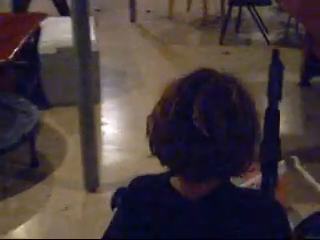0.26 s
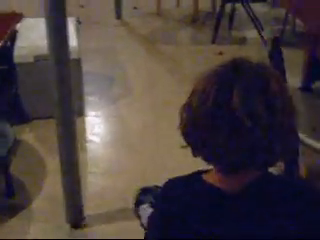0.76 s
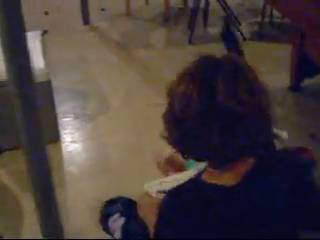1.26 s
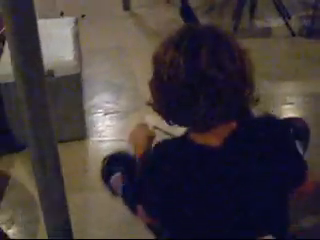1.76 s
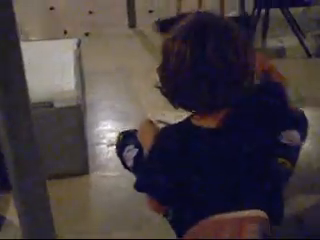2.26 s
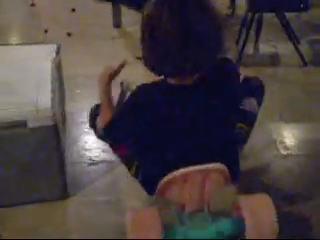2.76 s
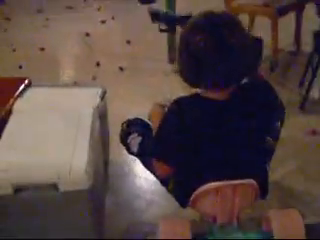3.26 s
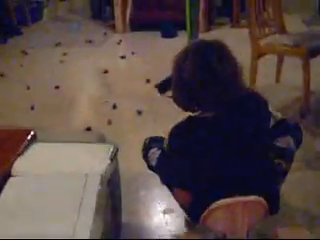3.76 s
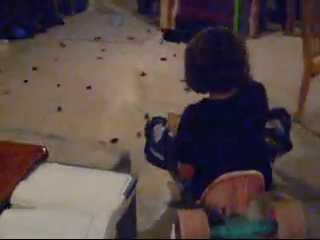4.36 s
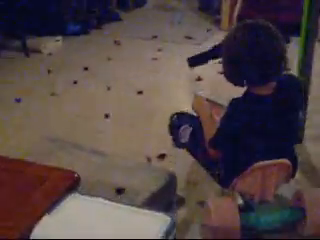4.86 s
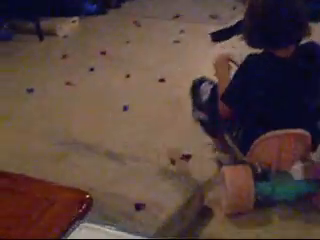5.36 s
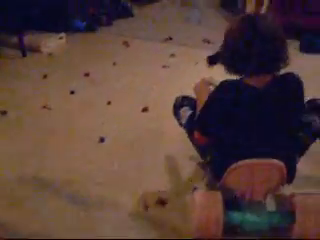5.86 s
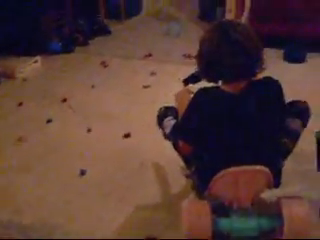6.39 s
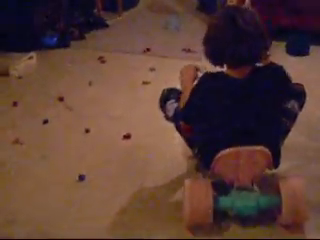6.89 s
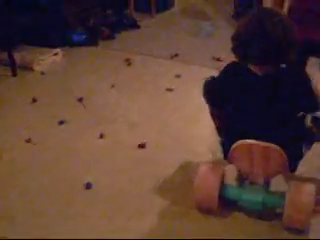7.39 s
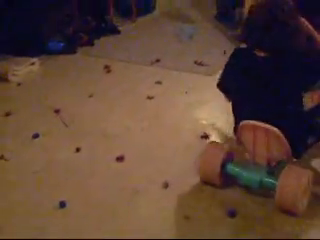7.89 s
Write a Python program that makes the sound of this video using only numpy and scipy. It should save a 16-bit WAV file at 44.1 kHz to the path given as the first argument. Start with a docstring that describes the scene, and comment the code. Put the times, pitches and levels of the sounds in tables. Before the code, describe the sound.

A plastic ride-on toy starts softly, rolls in rattling bursts across a basement floor, clacks hard twice, then rumbles on more quietly.

```python
"""In a basement, a ride-on toy with hollow hard plastic wheels starts softly and is pushed in bursts over concrete.
Floor grit drives wheel shells, rims, their air cavity and the frame; loose parts tick, knock and scrape.
Near 1.6 s and 2.2 s loud clacks (noise crack, falling snap, low thump) overload the converter, rebounds following.
A cavity hum locks in after 3.3 s; softer rolling with brief swells lasts to the end. The room adds a short tail
to the blows, and the small microphone's path ends near 4 kHz."""
import sys
import numpy as np
from scipy import signal
from scipy.fft import rfft, irfft, next_fast_len
from scipy.io import wavfile
from scipy.ndimage import uniform_filter1d, map_coordinates

SR = 44100
rng = np.random.default_rng(int(sys.argv[2]) if len(sys.argv) > 2 else 0)


def wav_record(signal):
    """Record a signal, one row per channel, as 16-bit PCM in the file named by sys.argv[1]."""
    frames = np.transpose(np.atleast_2d(signal))
    bounded = np.clip(frames, -1, 1)
    # unit amplitude maps onto the largest positive 16-bit level
    quanta = np.round(bounded * 32767).astype(np.int16)
    wavfile.write(sys.argv[1], SR, quanta)


N = 358567

# Decay of the basement's answer. Each row: frequency in Hz, t60 in s.
BASEMENT_DECAY = [(150, 0.92), (1000, 0.46), (4000, 0.47)]
# Colour of the floor rumble. Each row: frequency in Hz, gain in dB.
SLAB_COLOUR = [(10, 3.5), (30, -7), (50, 0), (90, -9), (125, -8), (170, -30.5)]
# Bass of the rolling. Each row: time in s, air cavity level in dB, floor rumble level in dB.
BASS_LEVELS = [(0.0, -47, -46.5), (0.27, -45, -42), (0.68, -36.5, -34), (1.18, -34.5, -34),
               (1.4, -35.5, -30.5), (1.63, -32, -33.5), (2.04, -33, -34), (2.22, -30.5, -29.5),
               (2.69, -31, -34.5), (3.1, -32, -30.5), (3.33, -37, -35.5), (3.76, -19.5, -31),
               (4.03, -32.5, -35), (4.41, -27.5, -30), (4.57, -31.5, -30), (4.78, -33.5, -38.5),
               (5.07, -38.5, -36.5), (5.34, -34, -40.5), (5.84, -43, -34.5), (6.07, -48, -39),
               (6.63, -39, -39.5), (6.97, -38.5, -36.5), (7.2, -40, -35), (8.13, -36.5, -33)]
# Soft single pushes through the floor. Each row: start in s, level in dB, width in s, rebound share.
FLOOR_BUMPS = [(1.5895, -17, .0007, 1.6), (1.5968, -4, 0.00085, 0.41), (1.606, -16.5, 0.0056, 0.8),
               (2.231, -9, 0.0016, 0.5), (2.9, -15.5, 0.00089, .6), (3.23, -14.5, 0.0013, 0.75),
               (4.0955, -12, 0.0011, 0.83), (4.1204, -7, 0.00075, 0.7), (5.8003, -14.5, 0.00078, 1.1),
               (5.85, -25.5, .001, 0.64), (5.899, -18, 0.00075, 0.96)]
# Plastic dragged over the floor. Each row: start in s, length in s, first Hz, last Hz, width in Hz, level in dB.
PLASTIC_SCRAPES = [(1.388, 0.12, 2274, 2174, 298, -26), (1.741, 0.2, 1045, 1386, 196, -23),
                   (6.902, 0.12, 2790, 2755, 308, -37.5), (7.601, 0.12, 2786, 2690, 504, -24)]
# Loose parts ticking. Each row: start in s, level in dB, t60 in s.
LOOSE_TICKS = [(0.1184, -26.5, 0.027), (.232, -30, 0.026), (.268, -34, .02), (0.3265, -24.5, 0.014),
               (.358, -29, 0.027), (0.407, -26.5, 0.055), (0.5857, -28, 0.12), (0.7284, -20, 0.025),
               (0.836, -11, 0.025), (0.9406, -13, 0.021), (1.0021, -17.5, 0.024), (1.105, -25.5, .03),
               (1.155, -19, 0.032), (1.2543, -14, 0.016), (1.3043, -16.5, .028), (1.3412, -12, 0.019),
               (1.3718, -23, .02), (1.398, -12, 0.015), (1.6269, -22.5, 0.071), (1.7471, -21.5, 0.075),
               (1.806, -14, 0.028), (1.922, -11.5, 0.028), (2.0287, -21, 0.11), (2.0598, -15.5, 0.047),
               (2.4902, -9.5, 0.038), (2.5133, -18, 0.04), (2.57, -12.5, 0.019), (2.604, -2, 0.0076),
               (2.674, -13, 0.039), (2.7215, -27, 0.035), (2.7867, -18.5, 0.056), (2.885, -20, 0.25),
               (3.1124, -25.5, 0.027), (3.174, -19, 0.075), (3.2276, -15, 0.022), (3.244, -13, 0.022),
               (3.315, -29, 0.034), (3.359, -23, 0.039), (3.386, -19, 0.049), (3.791, -16.5, 0.028),
               (3.874, -16, .02), (3.8884, -5, 0.02), (3.9371, -9.5, 0.017), (4.0291, -13, 0.042),
               (4.179, -21, 0.044), (4.2698, -15.5, 0.039), (4.297, -17, 0.041), (4.382, -15, 0.013),
               (4.409, -13, 0.072), (4.5182, -13.5, 0.028), (4.548, -23.5, 0.033), (4.6248, -19.5, 0.06),
               (4.726, -24, 0.048), (4.754, -3.5, 0.011), (4.831, -28.5, 0.025), (4.881, -23.5, 0.04),
               (4.911, -17, 0.044), (4.952, -17.5, .04), (5.043, -15, 0.015), (5.1458, -25.5, 0.1),
               (5.311, -22.5, 0.058), (5.421, -24.5, 0.027), (5.54, -26, 0.037), (5.5799, -18.5, 0.035),
               (5.7446, -22, 0.051), (6.0954, -27, 0.024), (6.151, -31.5, 0.018), (6.24, -36, 0.026),
               (6.345, -34, .02), (6.374, -19, 0.09), (6.463, -20.5, 0.033), (6.507, -24, 0.057),
               (6.5568, -11.5, 0.022), (6.639, -17, 0.04), (6.7056, -21, 0.041), (6.772, -28, 0.11),
               (6.8758, -15, 0.043), (6.89, -19.5, 0.04), (6.984, -19.5, 0.019), (7.0791, -22.5, 0.086),
               (7.167, -23, 0.026), (7.2144, -22, 0.036), (7.2973, -23.5, .03), (7.3471, -23.5, 0.053),
               (7.437, -22.5, 0.062), (7.4807, -20.5, 0.022), (7.509, -28, 0.079), (7.604, -23, 0.047),
               (7.622, -18.5, 0.043), (7.693, -18.5, 0.022), (7.768, -30, 0.012), (7.9, -23, .06),
               (7.92, -15, 0.024), (8.013, -12, 0.026), (8.0523, -6, 0.0064)]
# Dull knocks through the body. Each row: start in s, level in dB before an 8 dB lift, pitch in Hz.
BODY_KNOCKS = [(.2615, -24, 817), (.2965, -21, 813), (.7265, -17.5, 760), (.749, -12.5, 464),
               (1.395, -2, 844), (1.416, -7, 808), (1.462, -10.5, 805), (1.509, -4, 774),
               (1.627, -8.5, 798), (1.731, -4, 868), (2.058, -2, 872), (2.035, -8.5, 858),
               (2.095, -6.5, 880), (2.157, -4.5, 924), (2.061, -16.5, 287), (2.237, -11, 290),
               (2.31, -6, 852), (2.328, -11, 863), (2.273, -4, 878), (2.285, -6, 850), (2.892, -14.5, 184),
               (3.172, -10, 945), (4.068, -12, 780), (4.084, -17, 683), (4.295, -7, 780), (4.318, -7, 802),
               (4.412, 0.5, 840), (4.431, -6, 768), (4.44, -7.5, 852), (4.62, -8.5, 785),
               (4.754, -7.5, 709), (4.794, -15, 754), (4.952, -15.5, 1200), (5.35, -16.5, 712),
               (5.362, -17.5, 670), (5.512, -13, 773), (5.541, -16, 800), (6.18, -18, 980),
               (6.373, -8.5, 1290), (6.984, -16, 737), (7.003, -18.5, 805), (7.022, -14, 758),
               (7.183, -16, 790), (7.203, -15, 764), (7.668, -15, 760), (7.845, -15, 606),
               (8.012, -14.5, 985)]
# Loud clacks and their rebounds. Each row: start in s, level in dB, rise in s, hold in s, t60 in s,
# snap gain in dB, thump gain in dB, room send in dB.
LOUD_CLACKS = [(1.5925, -4, 0.003, 0.0054, 0.0023, 8, -6, -25.5),
               (2.2385, -3, 0.001, .009, 0.1, -2.5, -15, -3), (2.255, -10, .001, .003, .03, -10, -20, -10),
               (2.2615, -8, 0.001, 0.006, 0.03, -10, -18.5, -8),
               (2.2735, -10, 0.001, 0.003, 0.09, -6, -12, -8)]
# Colour of hard contacts and clacks. Each row: frequency in Hz, gain in dB.
CRACK_COLOUR = [(60, -8.5), (300, -10), (900, 3.5), (1500, -4.5), (2500, -4), (4000, -3)]
# Cavity hum during the hardest push. Each row: start in s, length in s, pitch in Hz, rms level in dB.
CAVITY_HUM = [(3.358, 0.075, 170, -23.5), (3.547, .29, 168.5, -20)]
# Shell singing under load. Each row: peak time in s, length in s, pitch in Hz, peak rms level in dB.
SHELL_SINGING = [(.27, .3, 828, -44), (.76, 0.39, 828, -20.5), (1.4, 0.42, 836, -22.5),
                 (1.297, 0.13, 706, -24.5), (1.74, 0.049, 880, -29), (2.08, 0.14, 875, -19),
                 (2.29, 0.12, 857, -15), (3.17, 0.41, 870, -32.5), (3.68, 0.22, 820, -24),
                 (4.31, 0.11, 805, -20.5), (4.45, 0.22, 818, -34), (4.78, 0.068, 824, -29.5),
                 (5.57, 0.21, 812, -35), (5.92, 0.16, 799, -25), (7.09, 0.68, 826, -35.5),
                 (7.63, 0.12, 834, -23), (7.86, 0.14, 839, -28.5)]
# Rolling. Each row: time in s, shell level in dB, frame level in dB, tread hiss level in dB.
ROLL_LEVELS = [(0.0, -37.5, -47, -38.5), (0.18, -40.5, -45, -47), (0.32, -41.5, -40, -40.5),
               (0.59, -31.5, -36, -33.5), (0.79, -22, -27.5, -30), (1.06, -30, -38.5, -32.5),
               (1.29, -22.5, -26, -28.5), (1.45, -18.5, -22, -25.5), (1.67, -27, -31.5, -30.5),
               (1.83, -33, -39.5, -26), (2.06, -23.5, -35, -29.5), (2.2, -16.5, -26, -22.5),
               (2.26, -23, -28, -20), (2.4, -23.5, -35.5, -25.5), (2.6, -28.5, -30, -27.5),
               (2.87, -25.5, -34.5, -28.5), (3.08, -26.5, -31, -29), (3.37, -27.5, -38.5, -25.5),
               (3.6, -24, -31.5, -26.5), (3.74, -20, -21, -25), (3.87, -20.5, -27.5, -24.5),
               (4.1, -20, -27.5, -24), (4.22, -24, -37, -27), (4.33, -25, -27, -25),
               (4.48, -25, -24, -23.5), (4.69, -29.5, -32.5, -34.5), (4.96, -29.5, -37, -27.5),
               (5.25, -32, -37.5, -34), (5.4, -28, -32.5, -37), (5.52, -29, -29.5, -38),
               (5.64, -29, -34.5, -37.5), (5.72, -31.5, -35, -29), (5.77, -28, -26.5, -27.5),
               (5.83, -24.5, -25, -21.5), (5.89, -22.5, -20, -23.5), (5.945, -25.5, -26, -22.5),
               (5.98, -32.5, -35, -26.5), (6.09, -34.5, -37.5, -35.5), (6.2, -32, -40, -39),
               (6.32, -30.5, -35, -38.5), (6.43, -32, -37, -36.5), (6.54, -36, -46, -33.5),
               (6.69, -37.5, -46, -33.5), (6.715, -30, -38.5, -31.5), (6.9, -30, -36.5, -33),
               (7.13, -26.5, -29.5, -33), (7.36, -32.5, -39, -35.5), (7.54, -28, -33, -31.5),
               (7.72, -24, -30, -29), (8.13, -28.5, -32, -31)]
# Rim ring while rolling. Each row: time in s, level in dB.
RIM_LEVELS = [(0.0, -47.5), (0.32, -44.5), (0.61, -30.5), (0.7, -32.5), (1.15, -34), (1.42, -25),
              (1.7, -32), (2.08, -25), (2.22, -23), (2.58, -31), (3.51, -30.5), (3.78, -24), (4.07, -27),
              (4.3, -27), (5.09, -34), (5.39, -37), (5.84, -31), (6.05, -38), (6.2, -41), (6.69, -38.5),
              (6.72, -36.5), (7.04, -33), (7.31, -42.5), (7.61, -36), (7.79, -33.5), (8.13, -32.5)]
# Wheel shell resonances. Each row: centre in Hz, width in Hz, relative gain in dB.
SHELL_MODES = [(571.3, 103, -1.5), (712.5, 147, -2), (761.3, 17.6, 4.5), (831, 58, -5), (880, 26, 1.5),
               (980, 69, -2.5)]
# Wheel rim resonances. Each row: centre in Hz, width in Hz, relative gain in dB.
RIM_MODES = [(1100, 45, 0.5), (1213, 92, -0.5), (1358, 150, -5)]
# Air cavity resonances, for one of two passes. Each row: centre in Hz, width in Hz, relative gain in dB.
CAVITY_MODES = [(117, 55, -4.5), (176, 73, 1.5), (210.5, 19, 3)]
# Frame resonances. Each row: centre in Hz, width in Hz, relative gain in dB.
FRAME_MODES = [(267, 96, -3), (396, 76, -1), (461.4, 64, -3)]
# Colour of tread hiss and tick crackle. Each row: frequency in Hz, gain in dB.
TREAD_COLOUR = [(1300, -42.5), (1500, -1), (1900, -1), (2300, 3), (2800, 2.5), (3500, -0.5), (4200, -4)]
# Upper edge of the microphone path. Each row: frequency in Hz, gain in dB.
MIC_EDGE_CURVE = [(3500, 0), (3800, -2), (3960, -7), (4040, -35), (4120, -70), (4300, -120)]

WANDER_PER_S, WANDER_DB = 9, 0.4  # rim, frame, cavity and slab each also swell slightly on their own
TICK_HZ, TICK_SPREAD = 2665, 0.14  # ring pitch and its scatter (share)
TICK_RISE_S, TAP_DB = 0.00072, 14  # tick onset; tap into shell and rim
KNOCK_T60_S, KNOCK_LOW_RINGS = 0.031, 0.86  # decay at 800 Hz; power by which lower knocks ring longer
HUM_EDGE_S, HUM_WAVER_HZ, HUM_WAVER_DB = 0.02, 4, 1.8
RATTLE_PER_S, RATTLE_SPREAD_DB, RATTLE_T60_S = 55, 3.2, 0.016
RIM_CRUMBS = 0.67  # power by which the rim follows the cracking grit
TOP_HZ, TOP_SLOPE_HZ = 16300, 700  # band limit of the clipping splash
KNEE = 0.94  # share of full scale where the converter starts to give


def amp(db):
    """Decibels to gain."""
    return 10 ** (np.asarray(db) / 20)


def unit(x):
    """Scaled to rms 1."""
    return x / np.sqrt(np.mean(x ** 2) + 1e-20)


def along(points, hz):
    """(Hz, value) points read on a log axis."""
    f, v = np.transpose(points)
    return np.interp(np.log(hz + 1), np.log(f + 1), v)


def curves(rows):
    """One value per sample for each column after the time."""
    s, *cols = np.transpose(rows)
    return [np.interp(np.arange(N) / SR, s, c) for c in cols]


def wobble(rate):
    """A smooth random curve, rate knots a second."""
    knots = rng.standard_normal(int(N * rate / SR) + 4)
    return map_coordinates(knots, [np.arange(N) * rate / SR])


def filtered(x, response):
    """x times a complex response of frequency."""
    m = next_fast_len(N + SR // 2)
    return irfft(rfft(x, m) * response(np.fft.rfftfreq(m, 1 / SR)), m)[..., :N]


def coloured(x, points):
    """x through a gain curve of (Hz, dB) points."""
    return filtered(x, lambda f: amp(along(points, f)))


def modes(table):
    """The response of a set of damped resonances, alternating in sign."""
    def response(f):
        total = 0
        for k, (centre, width, db) in enumerate(table):
            damping = 1j * f * width
            total = total + (-1) ** k * amp(db) * damping / (centre ** 2 - f ** 2 + damping)
        return total
    return response


def add(track, s, sound):
    """Mixes a short sound in at time s."""
    part = track[round(s * SR):][:len(sound)]
    part += sound[:len(part)]


def narrow_noise(hz, width_hz):
    """Noise of rms 1 in a narrow band around a moving centre, one sample per value of hz."""
    pole = np.exp(-np.pi * width_hz / SR)
    settle = SR // 10
    noise = rng.standard_normal((2, len(hz) + settle))
    slow = signal.lfilter([1], [1, -2 * pole, pole ** 2], noise)[:, settle:]
    turn = 2 * np.pi * np.cumsum(hz) / SR
    return unit(slow[0] * np.cos(turn) + slow[1] * np.sin(turn))


def patchy(x, depth_db):
    """Short-lived narrow swells: the many small modes of the plastic come and go as the wheels turn."""
    z = signal.stft(x, nperseg=1024)[2]
    field = uniform_filter1d(rng.standard_normal(z.shape), size=2, axis=0)
    field = uniform_filter1d(field, size=5, axis=1)
    return unit(signal.istft(z * amp(depth_db * unit(field)), nperseg=1024)[1][:N])


def basement(x):
    """A noise tail in which each frequency of the room's answer dies at its own speed."""
    hz, t, z = signal.stft(rng.standard_normal(SR // 2), SR, nperseg=256)
    decay = amp(-60 * t / along(BASEMENT_DECAY, hz)[:, None])
    tail = signal.istft(z * decay, SR, nperseg=256)[1]
    late = np.pad(x, (200, 0))  # 200 samples before the room answers
    return signal.fftconvolve(late, tail / np.linalg.norm(tail))[:N]


def slab():
    """The floor slab's rumble: steady low noise of rms 1."""
    return unit(coloured(rng.standard_normal(N), SLAB_COLOUR))


def bumps():
    """Pushes through the floor without ring: one smooth pulse and its opposite rebound."""
    out = np.zeros(N)
    for s, db, width, rebound in FLOOR_BUMPS:
        u = np.arange(SR // 20) / SR / width
        push = np.exp(-2 * (u - 1.5) ** 2)
        add(out, s, amp(db) * (push - rebound * np.exp(-(u - 3.2) ** 2)))
    return out


def scrapes():
    """Each drag excites one band that starts abruptly, slides and fades."""
    out, t = np.zeros(N), np.arange(SR // 2) / SR
    for s, length, first_hz, last_hz, width_hz, db in PLASTIC_SCRAPES:
        u = np.clip(t / length, 0, 1)
        stroke = np.sqrt(np.abs(np.sin(np.pi * u ** 0.17))) * (u < 1)
        centre_hz = first_hz + u * (last_hz - first_hz)
        add(out, s, amp(db) * stroke * narrow_noise(centre_hz, width_hz))
    return out


def ticks():
    """A crackle with a short plastic ring around one hard contact, which also taps shell and rim."""
    crackles, contacts, taps = np.zeros((3, N))
    t = np.arange(SR // 8) / SR
    for s, db, t60 in LOOSE_TICKS:
        crack = rng.standard_normal(len(t)) * 1.98
        hz = TICK_HZ * np.exp(TICK_SPREAD * rng.standard_normal())
        drift = np.cumsum(rng.normal(0, 0.26, len(t)))
        ring = np.sin(2 * np.pi * hz * t + drift) * 0.3
        shape = amp(db - 60 * t / t60) * (1 - np.exp(-t / TICK_RISE_S))
        add(crackles, s, shape * (crack + ring))
        add(contacts, s + 0.00091, amp(db) * rng.choice([-1, 1], 1))
        add(taps, s, amp(db + TAP_DB) * np.ones(1))
    hard = 10 * coloured(contacts, CRACK_COLOUR)
    return hard + coloured(crackles, TREAD_COLOUR) + filtered(taps, modes(SHELL_MODES + RIM_MODES))


def knocks():
    """A soft contact swells over a few cycles and rings unevenly at one pitch."""
    out, t = np.zeros(N), np.arange(SR // 4) / SR
    for s, db, hz in BODY_KNOCKS:
        drift = np.cumsum(rng.normal(0, 0.059, len(t)))  # close modes blur the phase
        fall_db = 60 * t / KNOCK_T60_S * (hz / 800) ** KNOCK_LOW_RINGS
        shape = amp(db + 8.0 - fall_db) * (1 - np.exp(-t / 0.005))
        add(out, s, shape * np.sin(2 * np.pi * hz * t + drift))
    return out


def clacks():
    """A broad crack, a snap that falls in pitch and a low thump; returns direct sound and room feed."""
    direct, send = np.zeros((2, N))
    t = np.arange(SR // 4) / SR
    snap_hz = 1300 + 3300 * np.exp(-t / 0.0024)
    snap = np.sin(2 * np.pi * np.cumsum(snap_hz) / SR)
    for s, db, rise, hold, t60, snap_db, thump_db, room_db in LOUD_CLACKS:
        shape = np.minimum(t / rise, 1) ** 2 * amp(db - 60 * np.maximum(t - hold, 0) / t60)
        crack = shape * (3 * rng.standard_normal(len(t)) + amp(snap_db) * snap)
        thump = -amp(db + thump_db - 60 * t / 0.051) * np.sin(2 * np.pi * 60 * t)
        add(direct, s, crack + thump)
        add(send, s, amp(room_db) * crack)
    return coloured(np.array([direct, send]), CRACK_COLOUR)


def hum():
    """The cavity locks into a nearly steady tone; also returns how far it holds the cavity noise down."""
    t, tone, size = np.arange(N) / SR, np.zeros(N), np.zeros(N)
    waver_hz, waver_db = HUM_WAVER_HZ * wobble(45), HUM_WAVER_DB * wobble(20)
    for s, length, hz, db in CAVITY_HUM:
        edges = np.clip(np.minimum(t - s, s + length - t) / HUM_EDGE_S, 0, 1) ** 2
        held = amp(db + waver_db) * edges
        tone += np.sqrt(2) * held * np.sin(2 * np.pi * np.cumsum(hz + waver_hz) / SR)
        size += held
    return tone, 1 / (1 + 30 * size)


def rattle():
    """Gain of tread hiss and rim: bigger crumbs of grit crack under the wheels at random in short bursts."""
    sizes_db = RATTLE_SPREAD_DB * rng.exponential(size=N).clip(0, 3)
    cracks = (rng.random(N) < RATTLE_PER_S / SR) * (amp(sizes_db) - 1)
    bursts = signal.lfilter([1], [1, -amp(-60 / (RATTLE_T60_S * SR))], cracks)
    return unit(1 + uniform_filter1d(bursts, size=SR // 500))


def singing():
    """Each swell is a narrow band of noise at the row's shell pitch, rising and falling smoothly."""
    out, t = np.zeros(N), np.arange(SR) / SR - 0.5
    for s, length, hz, db in SHELL_SINGING:
        shape = np.exp(-(2 * t / length) ** 2 * 2)
        swell = amp(db) * shape * narrow_noise(np.full(SR, hz), width_hz=57)
        skip = max(round((0.5 - s) * SR), 0)  # the part before time zero
        add(out, max(s - 0.5, 0), swell[skip:])
    return out


def grit(per_s, spread_db, share):
    """The floor under a wheel: fine roughness plus a power share of scattered grains of uneven size."""
    hit = rng.random(N) < per_s / SR
    grains = hit * rng.choice([-1, 1], N) * amp(spread_db * rng.uniform(-0.55, 1, N))
    return np.sqrt(share) * unit(grains) + np.sqrt(1 - share) * rng.standard_normal(N)


def rolling():
    """Grit under the treads shakes shell, rim, air cavity and frame, above the slab's rumble."""
    shell_db, frame_db, tread_db = curves(ROLL_LEVELS)
    cavity_db, slab_db = curves(BASS_LEVELS)
    rim_db = curves(RIM_LEVELS)[0] + WANDER_DB * wobble(WANDER_PER_S)
    frame_db = frame_db + WANDER_DB * wobble(WANDER_PER_S)
    cavity_db = cavity_db + WANDER_DB * wobble(WANDER_PER_S)
    slab_db = slab_db + WANDER_DB * wobble(WANDER_PER_S)
    bounce = wobble(22)  # the hard wheels load and unload together
    flutter_db = 2 * bounce + 1.2 * wobble(40)
    road = grit(300, spread_db=2, share=0.34)
    chips = grit(400, spread_db=6, share=0.45)
    shell = patchy(filtered(road, modes(SHELL_MODES)), depth_db=2.5)
    rim = patchy(filtered(road, modes(RIM_MODES)), depth_db=3.0)
    frame = patchy(filtered(road, modes(FRAME_MODES)), depth_db=2.5)
    tone, damping = hum()
    cavity = damping * unit(filtered(road, lambda f: modes(CAVITY_MODES)(f) ** 2))
    tread = unit(coloured(chips, TREAD_COLOUR))
    crumbs = rattle()
    body = amp(shell_db) * shell + amp(frame_db) * frame
    body += amp(rim_db) * crumbs ** RIM_CRUMBS * rim
    air = amp(cavity_db + 0.25 * bounce) * cavity + tone
    hiss = amp(tread_db + flutter_db) * crumbs * tread
    return amp(1.2 * bounce) * body + air + hiss + amp(slab_db) * slab()


def scene():
    """Rolling is diffuse already; only the blows get a separate room tail."""
    blows = ticks() + knocks() + bumps()
    clack, send = clacks()
    room = basement(amp(-5.0) * blows + send)
    return (rolling() + singing() + scrapes() + blows + clack + room)[None]


def record(dry):
    """A narrow microphone path, then a converter clipping over a short knee; its splash reaches higher."""
    narrow = coloured(dry, MIC_EDGE_CURVE)
    over = np.maximum(np.abs(narrow) - KNEE, 0)
    splash = np.sign(narrow) * ((1 - KNEE) * np.tanh(over / (1 - KNEE)) - over)
    return narrow + filtered(splash, lambda f: np.clip((TOP_HZ - f) / TOP_SLOPE_HZ, 0, 1) ** 2)


dry = scene()
out = record(dry)
wav_record(out)
```